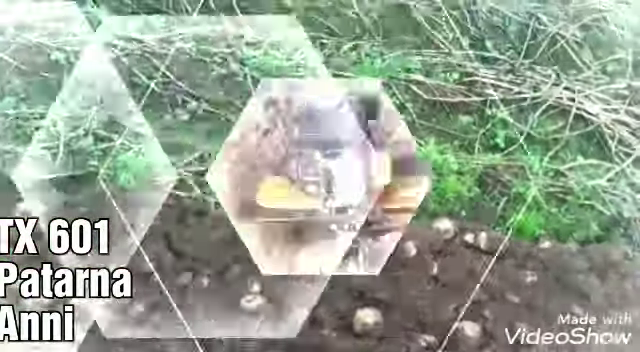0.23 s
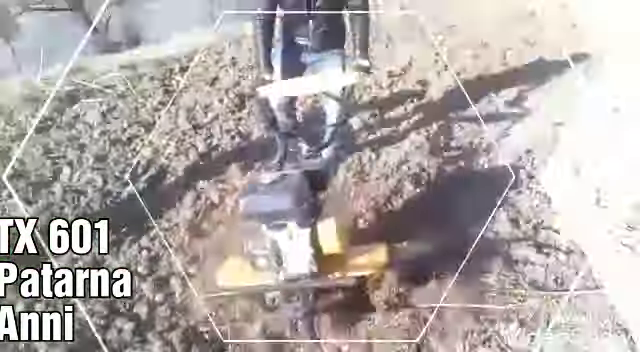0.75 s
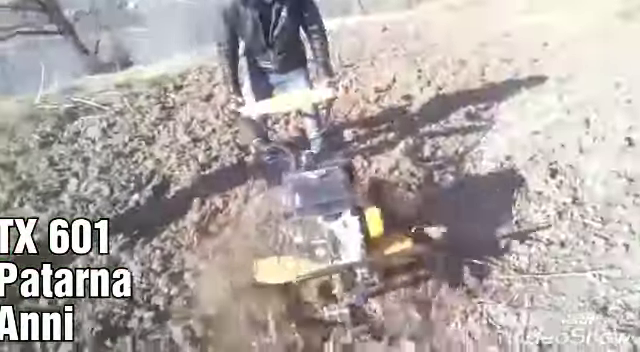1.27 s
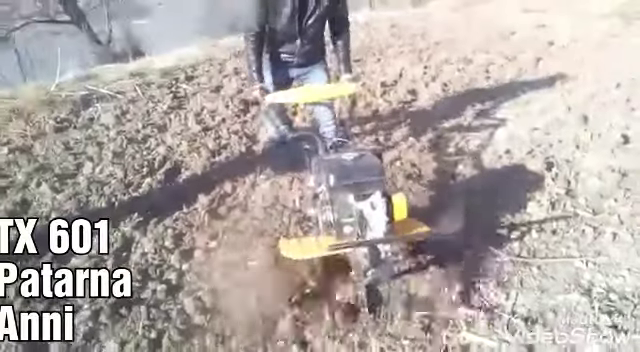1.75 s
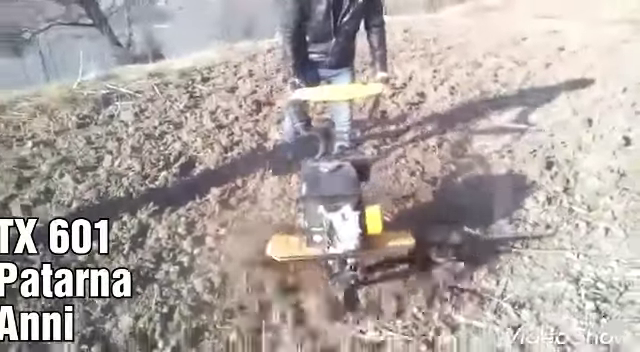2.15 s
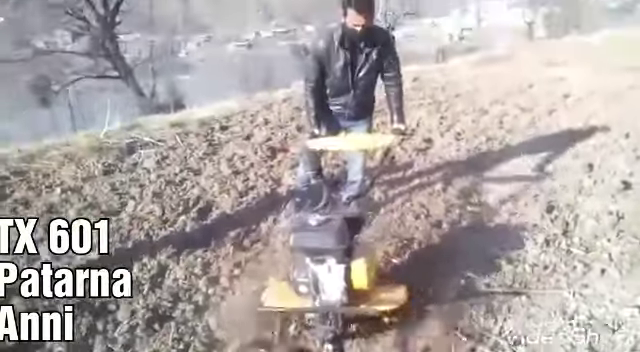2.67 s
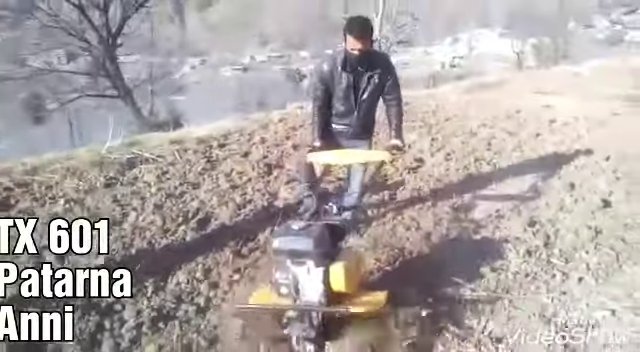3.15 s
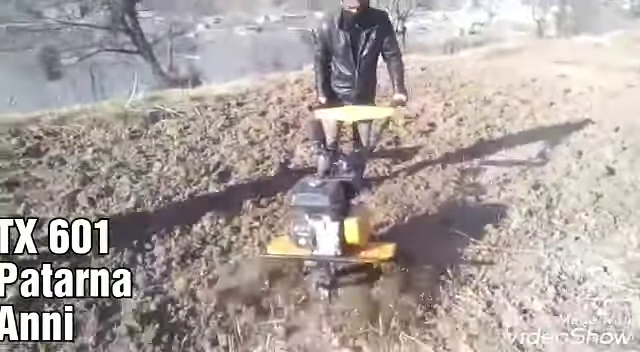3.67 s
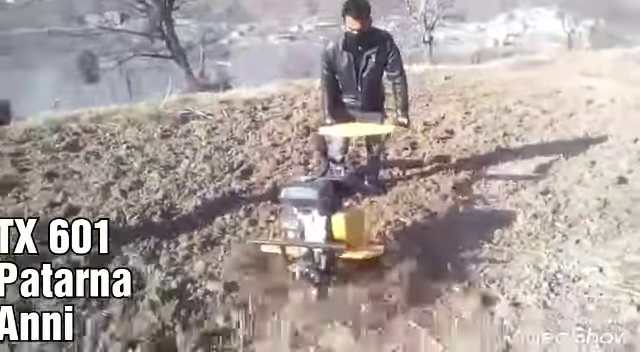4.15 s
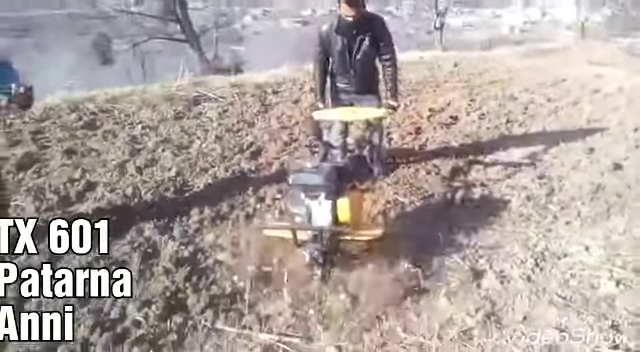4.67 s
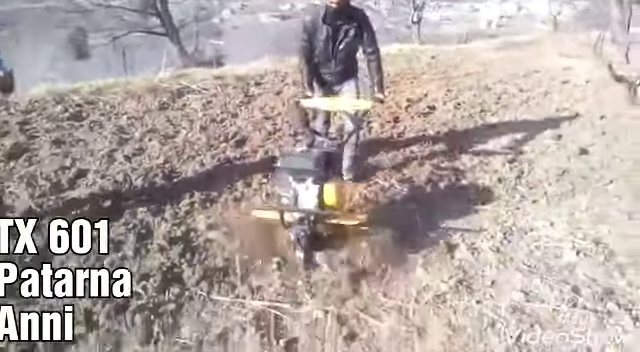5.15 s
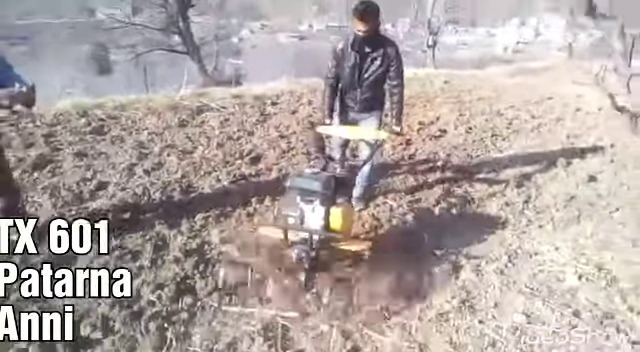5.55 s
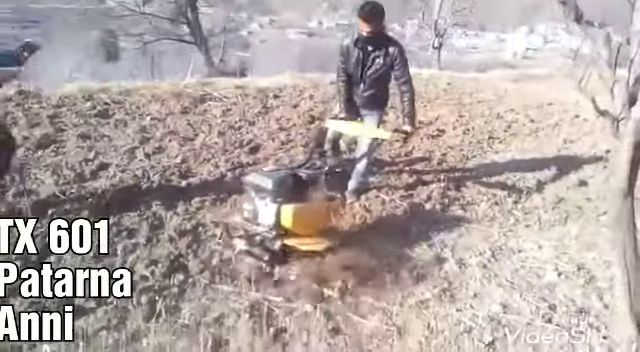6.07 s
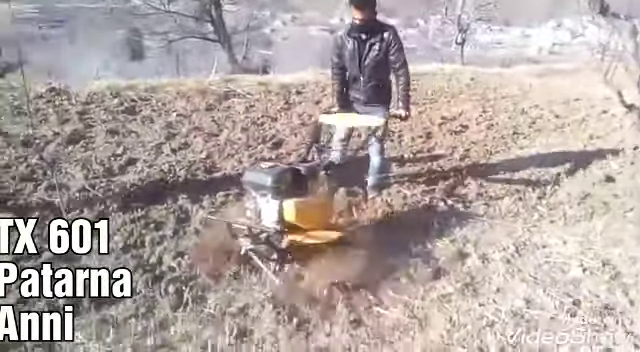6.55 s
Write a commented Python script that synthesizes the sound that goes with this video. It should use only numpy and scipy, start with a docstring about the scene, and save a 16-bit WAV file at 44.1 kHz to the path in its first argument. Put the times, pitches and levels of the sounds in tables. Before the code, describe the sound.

Outdoors, light gusts ruffle and thump the microphone while a small tiller engine runs under load a few metres away. Rapid, sputtering exhaust pulses sit over a low throb, a tinny rattle and hissing air. The exhaust hardens briefly, again and again, as the tines drag through the soil, and an occasional clod knocks against the machine. The wind mostly fades about halfway through, and the engine keeps a nearly constant pace.

```python
"""A tiller in dry soil

A walk-behind tiller with a one-cylinder four-stroke engine is heard from a few metres. Each firing
sends a low pulse and a bright turbulent puff out of the silencer, harder when the tines bite and drag
the crank. Valves and gears ring the block and its tin covers, intake and cooling air hiss, and gusts
of wind, mostly early on, buffet the microphone."""
import sys
import numpy as np
from scipy import signal
from scipy.fft import rfft, irfft, next_fast_len
from scipy.io import wavfile
from scipy.ndimage import uniform_filter1d

SR = 44100
rng = np.random.default_rng(int(sys.argv[2]) if len(sys.argv) > 2 else 0)


def store_pcm(level_fs):
    """Save levels as 16-bit WAV."""
    pcm = np.round(np.clip(level_fs, -1, 1) * 32767).astype(np.int16)
    wavfile.write(sys.argv[1], SR, np.atleast_2d(pcm).T)


N = 300762

# Noise spectra. Each row: frequency in Hz, relative spectral density in dB.
WIND_RUMBLE = [(30, -26), (70, -10), (130, -2.5), (250, -4), (400, -28)]
WIND_FLUTTER = [(200, -22), (320, -5.5), (600, -7.5), (1200, -16), (2200, -21)]
CHASSIS_RUMBLE = [(25, -15.5), (50, -2.5), (100, -7), (250, -6.5), (600, 1.5), (1500, -42)]
# The breeze between gusts. Each row: time in seconds, rumble and flutter levels in dB.
BREEZE = [(0, -44.5, -41.5), (1.1, -61, -50.5), (1.8, -48.5, -48.5), (2.1, -70, -49), (2.6, -51.5, -49),
          (3.1, -52.5, -53), (3.6, -57.5, -55), (5.5, -59.5, -56.5)]
# Gusts. Each row: start and length in seconds, rumble and flutter levels in dB at full swell.
GUSTS = [(-.02, 0.039, -49, -63), (0.253, 0.25, -49, -48), (0.582, 0.11, -43, -52),
         (0.66, 0.24, -43.5, -41), (1.16, 0.16, -51.5, -50), (1.39, 0.062, -41, -49),
         (1.615, 0.11, -62, -56), (2.108, 0.11, -50, -55), (2.29, 0.12, -52.5, -74),
         (2.648, 0.18, -60, -54), (2.846, 0.04, -56, -56), (3.2, 0.17, -47, -49.5),
         (5.256, 0.096, -64, -51)]
# Wind thumps. Each row: start in seconds, peak in dB, centre in Hz, decay time in seconds.
THUMPS = [(0.05, -25, 343, 0.0029), (0.722, -29, 203, 0.009), (0.777, -24, 800, 0.005),
          (0.832, -23.5, 252, 0.0034), (0.862, -27, 300, 0.0061), (0.936, -28, 151, 0.013),
          (1.451, -29, 283, 0.0071), (1.465, -23, 290, 0.0052), (1.468, -24, 810, 0.0039),
          (1.651, -24, 346, 0.0028), (2.321, -27.5, 560, 0.0057), (2.369, -31.5, 188, 0.0087),
          (2.39, -30.5, 160, 0.012), (2.847, -20, 454, 0.0042), (2.858, -31, 268, 0.012),
          (2.886, -33, 170, 0.0067), (2.906, -30, 268, 0.0078), (2.914, -36, 245, 0.005),
          (3.114, -38, 50, 0.0078), (3.387, -29, 350, 0.0058)]
# Flickers of the treble. Each row: centre in seconds, levels in dB near 10 kHz and 13.5 kHz,
# half length in seconds.
TICKS = [(2.112, -66, -99, .005), (2.179, -59, -67, .005), (2.637, -64, -74, 0.0052),
         (2.757, -67, -74, 0.0035), (3.949, -65, -71, 0.0052), (4.204, -68, -85, .005),
         (4.462, -64, -72, .005), (4.585, -66, -99, 0.012), (4.879, -63, -78, 0.0036),
         (5.715, -61, -74, 0.003), (5.88, -64, -79, 0.0062), (5.943, -64, -80, .005),
         (6.218, -63, -80, 0.0058), (6.261, -80, -52, .016), (6.294, -60, -71, 0.0052),
         (6.32, -67, -75, .005), (6.359, -56, -58, .004), (6.426, -51, -46, 0.0028),
         (6.55, -59, -75, 0.0042), (6.587, -58, -59, .005), (6.713, -58, -70, 0.006)]

# Resonances. Each row: frequency in Hz, bandwidth of one filter stage in Hz, relative gain in dB.
AIR_MODES = [(4100, 1480, 10.5), (4610, 750, 6), (5600, 1400, -16), (7300, 330, -35)]
BLOCK_MODES = [(328, 250, -19.5), (520, 400, -6.5), (806, 620, 0), (1080, 440, -5.5), (1402, 720, 3),
               (2341, 230, 4), (2330, 1250, -3), (2627, 210, -7)]
TIN_MODES = [(348.3, 12, 1), (593, 26, -10), (717, 66, -2.5), (866, 98, -3.5), (933, 37, -0.5),
             (1013.6, 40.5, 1.5), (1147.4, 47, -2)]
SHELL_MODES = [(1630, 840, 7), (2260, 810, 4.5)]
BAFFLE_MODES = [(3050, 170, -9), (3420, 150, -7.5), (3664, 170, -1), (3985, 310, -2.5), (4156, 130, 1.5),
                (4525, 240, 3), (4883, 200, 2.5), (5300, 200, -2.5), (5903, 160, -9)]
VALVE_SNAP_MODES = [(2280, 1300, -2.5), (3620, 620, 5.5), (5500, 950, 1)]
JET_LOW_MODES = [(2880, 210, 0), (3085, 120, -1.5), (3526, 580, 5.5)]
JET_MID_MODES = [(3606, 380, 0.5), (4023, 530, 4.5), (4335, 420, 2.5), (4580, 770, 1.5), (4620, 540, 2)]
JET_HIGH_MODES = [(4930, 490, -3.5), (5296, 390, -3.5), (5560, 620, -7.5), (6400, 500, -13),
                  (9600, 1460, -11)]

# Balance changing with distance and angle. Each row: time in seconds, then relative levels in dB of
# the tin, the hiss, the block, the low side of the jet and its high side.
BALANCE = [(0, -43, -36, -38, 1.5, 5), (.45, -44.5, -38.5, -39, -2, -9.5), (.85, -45, -37.5, -38, -7, -4),
           (1.3, -43, -40, -38.5, -6.5, -11.5), (1.85, -43, -39, -40.5, -5.5, -8.5),
           (2.35, -46.5, -39.5, -40, -7.5, -11.5), (2.85, -45.5, -40.5, -39, -7.5, -7.5),
           (3.3, -47.5, -42, -37.5, -8.5, -5.5), (3.65, -48, -41.5, -41, -26, -12.5),
           (4.0, -45.5, -42.5, -39.5, -11.5, -9), (4.5, -48, -41.5, -42, -14.5, -9.5),
           (5.1, -45, -42, -41.5, -6.5, -8), (5.7, -49, -42, -41, -9.5, -6.5),
           (6.3, -46, -43.5, -41.5, -18, -16), (6.82, -50, -42.5, -39, -17, -7)]
# Panels facing the microphone as the machine turns. Each row: time in seconds, then gains in dB of
# the modes near 350, 720, 930, 1010, 1150 and 2630 Hz.
PANEL_FACING = [(0, 0, 0.5, -4, 1, 3.5, 4), (1.4, -3, 0.97, -3, 0.5, -3, 2.5),
                (2.15, 1, 0.62, 4, -0.5, -7.5, -5), (2.6, 0.5, 1, 0.5, 0, -6, 2),
                (3.2, 0.5, -1.5, -2, 6, -4, 9.5), (4.1, 4, -1.8, -3, 2, -1, 6),
                (4.9, 1, 0, -1.5, -1.5, 5, -9), (5.6, -6, -1, -2.5, -2.5, 5.5, -1.5),
                (6.82, 3, 0.22, -0.5, 0, 3, -5)]
# The jet's colour as the outlet turns. Each row: time in seconds, gains in dB near 4, 4.3 and 4.6 kHz.
OUTLET_FACING = [(0, 8.5, 4.3, 3.5), (1.0, 6, -1.2, 6.7), (2.2, 2.5, 6, -1), (3.0, 0.5, 2.5, 6),
                 (3.6, -6.5, 2.2, -3.5), (4.1, 0, -1.5, 4), (4.7, -5.5, 6.2, -5.5), (5.3, 3, -2, 7),
                 (5.9, -4, -4.5, 4.5), (6.3, -11, 8, 6.5), (6.82, -6, 8.5, -6)]
# Reflection off the soil. Each row: time in seconds, delay in milliseconds, reflection coefficient.
GROUND_ECHO = [(0, 0.88, 0.08), (1.8, 0.87, 0.26), (3.5, 0.95, 0.3), (4.4, 0.97, 0.5), (5.2, 1.11, 0.16),
               (6.1, 1.06, 0.32), (6.82, 1, 0.32)]
# Clods striking the machine. Each row: start in seconds, peak in dB relative to the steady clatter.
CLOD_KNOCKS = [(2.12, 8), (3.96, -0.5), (4.51, 7), (5.18, -0.5), (5.29, 0)]
# Difference between the channels. Each row: time in seconds, level in dB relative to their common part.
STEREO_WIDTH = [(0, -22.5), (4.0, -25), (5.0, -31), (6.82, -49.5)]

# The crank's pace without drag. Each row: time in seconds, count of firings so far.
CRANK_PACE = [(-0.02, -0.28), (0.6, 19.26), (1.5, 47.84), (2.4, 76.78), (3.3, 105.07), (4.2, 133.5),
              (5.1, 161.94), (6.0, 190.93), (6.85, 218.13)]
# Bites of the tines. Each row: start in seconds, relative puff level in dB at open throttle, seconds
# until the throttle starts closing, firings lost to drag, seconds the throttle takes to open.
BITES = [(-0.044,-33.5,0.47,0.238,0.26), (0.48,-31.5,0.18,0.097,0.28), (0.902,-34,0.37,0.18,0.17),
         (1.486,-31,0.19,0.465,0.28), (1.98,-30.5,0.26,0.575,0.15), (2.47,-33,0.21,0.199,0.21),
         (2.78,-37,0.31,0.044,0.2), (3.113,-31.5,0.38,0.289,0.27), (3.664,-29.5,0.23,0.349,0.26),
         (4.019,-37.5,0.078,0,.23), (4.334,-32,0.22,0.288,0.2), (4.66,-38,0.32,0.137,0.15),
         (5.091,-33,0.19,0.413,0.23), (5.439,-36,0.17,0.298,0.25), (5.684,-32.5,0.21,0.309,0.27),
         (6.093,-27,0.23,0.465,.23), (6.431,-29.5,0.25,0.346,0.23)]
# Exhaust harmonics. Each row: multiple of the firing rate, nominal levels in dB at start and end.
EXHAUST_ORDERS = [(2, -68, -67.5), (3, -56, -61.5), (4, -63.5, -65), (5, -51, -53), (6, -58, -54.5),
                  (7, -58, -83.5), (8, -54, -62.5), (9, -59.5, -67.5), (10, -60.5, -68.5), (11, -64, -71.5),
                  (12, -61, -73.5)]
# Firings of prescribed strength. Each row: time in seconds, level in dB relative to a typical firing.
SET_FIRINGS = [(0.225, 2.5), (1.085, 3), (3.885, 0), (4.623, 2), (5.941, 0.5), (6.328, -1), (6.589, -1.5)]

CONTROL_STEP = 64   # samples between points of a slow control
GUST_RISE_S, GUST_FALL_S = 0.094, 0.047
KNOCK_FALL_S, SOIL_CUTOFF_HZ = 0.044, 2750
DRAG_LEAD_S, DRAG_S = 0.031, 0.347   # drag begins a little before the throttle answers
IDLE_DB, THROTTLE_FALL_S = -70.5, 0.2
OVERLOAD = 0.34   # peaks round off towards this height


def amp(db):
    """Amplitude ratio of a level in decibels."""
    return 10 ** (np.asarray(db) / 20)


def unit_rms(x):
    """Normalisation to a root mean square of 1."""
    return x / np.sqrt(np.mean(x ** 2) + 1e-20)


def curves(rows):
    """Linear interpolation in time: each column of a table at every sample."""
    times, *columns = np.transpose(rows)
    return [np.interp(np.arange(N) / SR, times, column) for column in columns]


def since(starts):
    """Elapsed seconds at the control rate, one row per event."""
    return np.arange(0, N + CONTROL_STEP, CONTROL_STEP) / SR - np.asarray(starts)[:, None]


def full_rate(slow):
    """Linear interpolation of a slow control to every sample."""
    return np.interp(np.arange(N) / CONTROL_STEP, np.arange(len(slow)), slow)


def ease(u):
    """Cubic smooth step from 0 to 1."""
    u = np.clip(u, 0, 1)
    return u * u * (3 - 2 * u)


def decay(start_s, fall_s):
    """Exponential decay after a sudden onset."""
    age = np.arange(N) / SR - start_s
    return (age > 0) * np.exp(-np.abs(age) / fall_s)


def drift(hz):
    """Random fluctuation: low-passed noise of rms 1."""
    r = np.exp(-2 * np.pi * hz / SR)
    return unit_rms(signal.lfilter([1], [1, -2 * r, r * r], rng.standard_normal(N + SR))[SR:])


def coloured(spectrum):
    """Spectral shaping of white noise, at rms 1."""
    hz, level_db = np.transpose(spectrum)
    size = next_fast_len(N)
    bins = np.maximum(np.fft.rfftfreq(size, 1 / SR), 1)
    shape = amp(np.interp(np.log(bins), np.log(hz), level_db, right=-99))
    return unit_rms(irfft(rfft(rng.standard_normal(size)) * shape, size)[:N])


def resonance(x, hz, width_hz):
    """Damped resonance: two like two-pole stages in cascade, with peak gain 1."""
    r = np.exp(-np.pi * width_hz / SR)
    b = [(1 - r * r) / 2, 0, (r * r - 1) / 2]
    a = [1, -2 * r * np.cos(2 * np.pi * hz / SR), r * r]
    return signal.lfilter(b, a, signal.lfilter(b, a, x))


def ring(modes, drive, firing, spread_db, memory, trims_db=None):
    """Modal superposition at rms 1: noise drives modes whose shares wander from firing to firing."""
    chance = rng.standard_normal((firing[-1] + 1, len(modes)))
    shares = amp(spread_db * signal.lfilter([np.sqrt(1 - memory ** 2)], [1, -memory], chance, axis=0))
    shares /= np.sqrt(np.mean(shares ** 2, axis=1, keepdims=True))
    response = 0
    for (hz, width_hz, db), share, trim_db in zip(modes, shares.T, trims_db or [0] * len(modes)):
        force = rng.standard_normal(N) * drive * share[firing]
        response += amp(db + trim_db) * resonance(force, hz, width_hz)
    return unit_rms(response)


def thump(start_s, hz, fall_s):
    """A heavily damped transient of peak 1: one puff of air on the microphone port."""
    swing = np.cos(2 * np.pi * hz * (np.arange(N) / SR - start_s))
    push = decay(start_s, fall_s) * (swing + 0.45 * rng.standard_normal(N))
    pressure = resonance(push + 1e-18, hz, width_hz=4.9 * hz)
    return pressure / np.max(np.abs(pressure))


def wind():
    """Turbulent pressure on the microphone port: a breeze, swelling gusts and single thumps."""
    lumps = amp(2.0 * drift(40))
    start, length, *gusts_db = np.transpose(GUSTS)
    age = since(start)
    swell = ease(age / GUST_RISE_S) * np.exp(-np.maximum(age - length[:, None], 0) / GUST_FALL_S)
    pressure = sum(amp(db) * thump(s, hz, fall_s) for s, db, hz, fall_s in THUMPS)
    for spectrum, breeze_db, gust_db in zip((WIND_RUMBLE, WIND_FLUTTER), curves(BREEZE), gusts_db):
        strength = amp(breeze_db) + full_rate(amp(gust_db) @ swell)
        pressure += strength * unit_rms(coloured(spectrum) * lumps)
    return pressure


def ticks():
    """Amplitude modulation: brief Gaussian envelopes on two noise bands make the treble flicker."""
    centre, lower_db, upper_db, half_length = np.transpose(TICKS)
    envelopes = np.exp(-(since(centre) / half_length[:, None]) ** 2)
    flicker = 0
    for edges_hz, db in [([8600, 11200], lower_db), ([12000, 14900], upper_db)]:
        band = signal.butter(7, edges_hz, "band", fs=SR, output="sos")
        noise = unit_rms(signal.sosfilt(band, rng.standard_normal(N)))
        flicker += full_rate(amp(db) @ envelopes) * noise
    return flicker


def over_soil(direct):
    """Interference: a dull echo off the soil cuts a hollow in the spectrum of the direct sound."""
    delay_ms, reflection = curves(GROUND_ECHO)
    dull = signal.sosfilt(signal.butter(2, SOIL_CUTOFF_HZ, fs=SR, output="sos"), direct)
    samples = np.arange(N)
    return direct + reflection * np.interp(samples - delay_ms * SR / 1000, samples, dull)


def air_hiss(cycles):
    """Flow noise: intake and cooling air hiss unsteadily through broad resonances."""
    return ring(AIR_MODES, amp(1.85 * drift(78)), cycles.astype(int), spread_db=-0.1, memory=0.34)


def crank_cycles():
    """Rotational inertia: the count of firings falls behind at each bite, smoothed by the flywheel."""
    start, _, _, lost, _ = np.transpose(BITES)
    behind = lost @ ease(since(start - DRAG_LEAD_S) / DRAG_S)
    cycles = curves(CRANK_PACE)[0] - full_rate(behind)
    padded = np.pad(cycles, 4000, mode="reflect", reflect_type="odd")
    return uniform_filter1d(padded, size=3001)[4000:-4000]


def throttle_db():
    """Response to load: the puff level rises as the throttle opens at each bite, holds and falls."""
    start, open_db, hold, _, rise = np.transpose(BITES)
    age = since(start)
    closing = np.exp(-(np.maximum(age - hold[:, None], 0) / THROTTLE_FALL_S) ** 2)
    opening = ease(age / rise[:, None]) * closing
    return full_rate(20 * np.log10(amp(IDLE_DB) + amp(open_db) @ opening))


def pulse(cycles, rise, hold, fall):
    """Periodic relaxation: a quick rise, a plateau and an exponential fall, in fractions of a cycle."""
    phase = cycles % 1
    return np.clip(phase / rise, 0, 1) * np.exp(-np.maximum(phase - hold, 0) / fall)


def clatter(cycles, tin_db, block_db):
    """Forced vibration: valves and gears tap block and tin covers, most at each firing; clods knock."""
    firing = cycles.astype(int)
    taps = amp(2.0 * drift(420)) * (0.82 + 0.5 * pulse(cycles + 0.088, rise=0.031, hold=0.24, fall=0.11))
    db_350, db_720, db_930, db_1010, db_1150, db_2630 = curves(PANEL_FACING)
    block = ring(BLOCK_MODES, taps, firing, spread_db=2.0, memory=0.75, trims_db=[0] * 7 + [db_2630])
    tin = ring(TIN_MODES, taps, firing, spread_db=2.6, memory=0.75,
               trims_db=[db_350, 0, db_720, 0, db_930, db_1010, db_1150])
    knocks = 1 + sum((amp(db) - 1) * decay(s, KNOCK_FALL_S) for s, db in CLOD_KNOCKS)
    return (amp(block_db) * block + amp(tin_db) * tin) * knocks


def exhaust_tone(cycles, load_db):
    """Fourier synthesis: harmonics add up to one pressure dip a firing, fuller under load."""
    progress = np.arange(N) / N
    tone = 0
    for order, start_db, end_db in EXHAUST_ORDERS:
        level_db = start_db + (end_db - start_db) * progress + 0.23 * order * drift(4.9)
        lag_rad = np.exp(-((order - 6.2) / 0.86) ** 2)   # orders just above the silencer's ring lag
        tone -= amp(level_db) * np.cos(2 * np.pi * order * cycles - lag_rad)
    return np.sqrt(2) * amp(0.8 * drift(6.0) + 0.12 * load_db) * tone


def even_out(jet, flow, cycles, evenness=0.35):
    """Energy scaling: like charges of gas are drawn towards puffs of like strength."""
    puff = (cycles + 0.1).astype(int)
    efficiency = np.bincount(puff, jet ** 2) / (np.bincount(puff, flow ** 2) + 1e-9) + 1e-9
    return jet * ((np.mean(efficiency) / efficiency) ** (evenness / 2))[puff]


def exhaust_puffs(cycles, load_db, low_db, high_db):
    """Blowdown: each release of gas drives a turbulent jet and rings the silencer's shell and baffles."""
    firing = cycles.astype(int)
    jittered = cycles + 0.0066 * rng.standard_normal(firing[-1] + 1)[firing]
    uneven_db = 0.8 * rng.standard_normal(firing[-1] + 1)
    for s, db in SET_FIRINGS:
        uneven_db[firing[int(s * SR)]] = db
    strength = amp(uneven_db)[firing]
    ragged = amp(1.2 * drift(300))
    flow = strength * ragged * pulse(jittered + 0.021, rise=0.031, hold=0.2, fall=0.098)
    flow *= 1 + 0.26 * np.exp(-((cycles + 0.034) % 1) / 0.044)   # extra flow as the valve cracks open
    db_4000, db_4300, db_4600 = curves(OUTLET_FACING)
    # the jet's sides and the shell follow the load less than its middle does
    bands = [(JET_MID_MODES, 0, [0, db_4000, db_4300, 0, db_4600]),
             (JET_LOW_MODES, low_db - 0.14 * load_db, None),
             (JET_HIGH_MODES, high_db - 0.047 * load_db, None),
             (SHELL_MODES, -16 - 0.73 * load_db, None)]
    jet = sum(amp(db) * ring(modes, flow, firing, spread_db=3.4, memory=0.4, trims_db=trims)
              for modes, db, trims in bands)
    jet += amp(-5) * ring(BAFFLE_MODES, flow, firing, spread_db=6.0, memory=0.3)
    snap = strength * pulse(jittered + 0.029, rise=0.01, hold=0.024, fall=0.07)
    jet += amp(-12) * ring(VALVE_SNAP_MODES, snap, firing, spread_db=3.5, memory=0.3)
    return even_out(jet, flow, cycles)


def scene():
    """Superposition of machine and wind, softly saturated and nearly alike in both channels."""
    cycles, puff_db = crank_cycles(), throttle_db()
    load_db = puff_db - np.mean(puff_db)
    tin_db, hiss_db, block_db, low_db, high_db = curves(BALANCE)
    hiss = amp(hiss_db + 0.18 * load_db) * air_hiss(cycles)
    puffs = amp(puff_db) * exhaust_puffs(cycles, load_db, low_db, high_db)
    tone = exhaust_tone(cycles, load_db)
    structure = amp(-2.5) * clatter(cycles, tin_db, block_db) + amp(-58) * coloured(CHASSIS_RUMBLE)
    mix = tone + puffs + hiss + over_soil(structure) + wind()
    rounded = OVERLOAD * np.tanh(mix / OVERLOAD)
    # all but the ticks falls away steeply above the jet
    mid = signal.sosfilt(signal.cheby2(8, 50, 9600, fs=SR, output="sos"), rounded) + ticks()
    # a faint wavering delayed copy tells the channels apart
    side = amp(curves(STEREO_WIDTH)[0] + 0.65 * drift(3.8)) * np.roll(mid, 90) * drift(35)
    return np.array([mid + side, mid - side])


def record(dry):
    """Band limiting: a steep low-pass filter stops the treble above 15.2 kHz."""
    return signal.sosfilt(signal.cheby2(14, 40, 15200, fs=SR, output="sos"), dry)


dry = scene()
out = record(dry)
store_pcm(out)
```